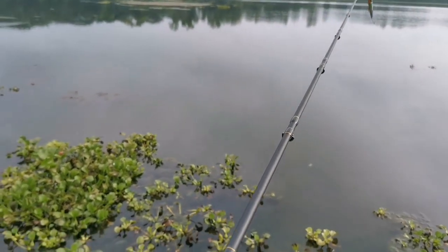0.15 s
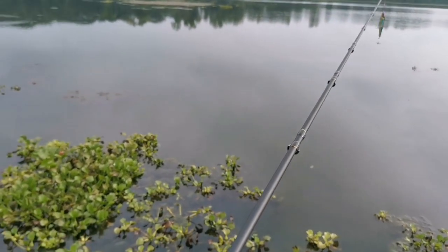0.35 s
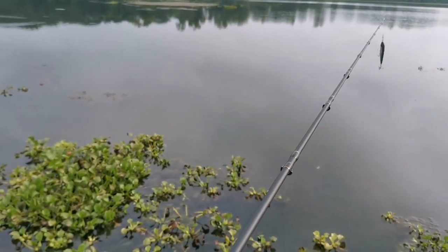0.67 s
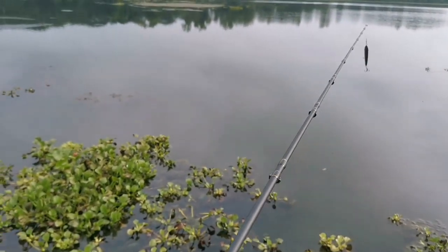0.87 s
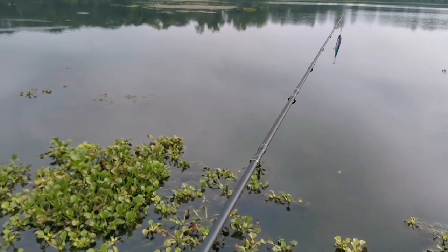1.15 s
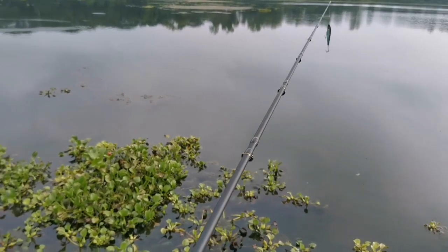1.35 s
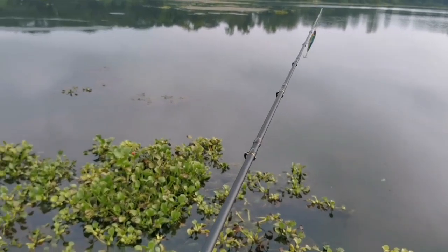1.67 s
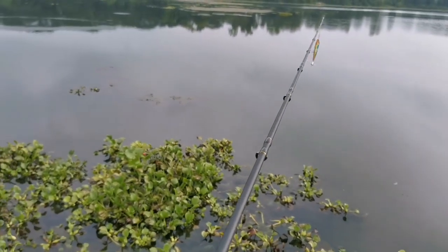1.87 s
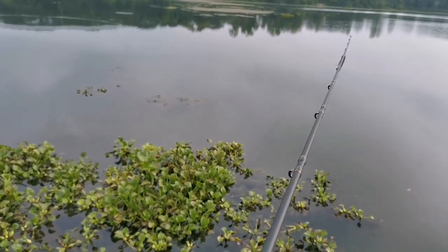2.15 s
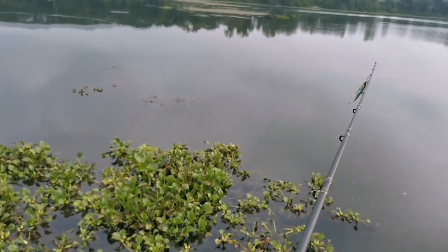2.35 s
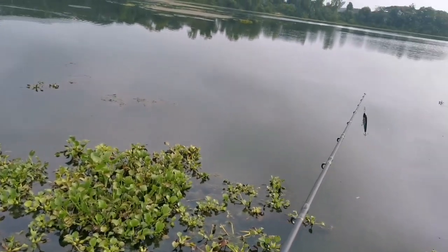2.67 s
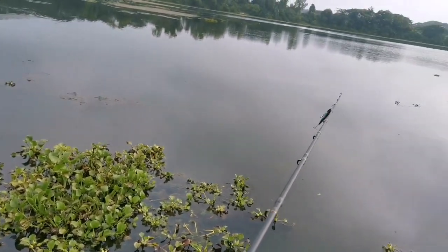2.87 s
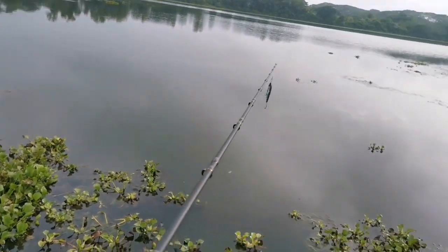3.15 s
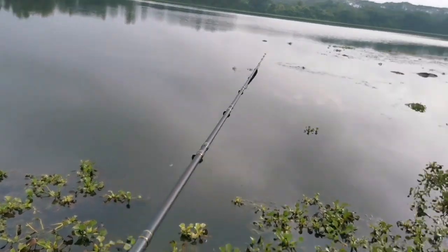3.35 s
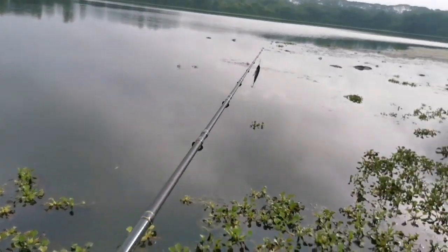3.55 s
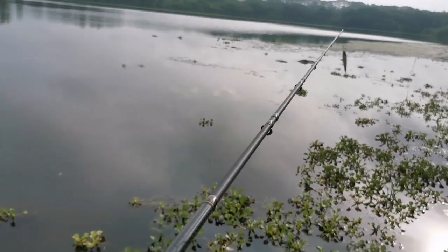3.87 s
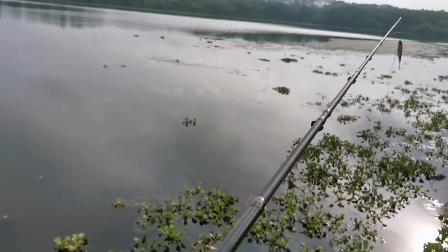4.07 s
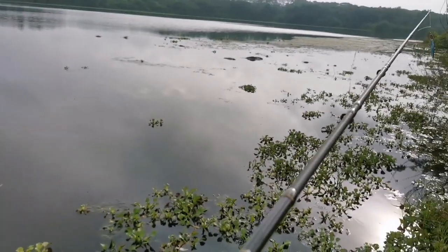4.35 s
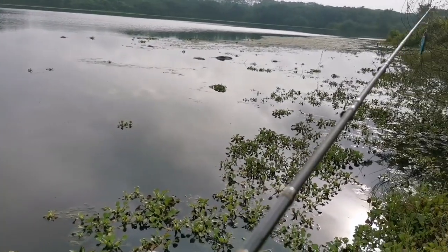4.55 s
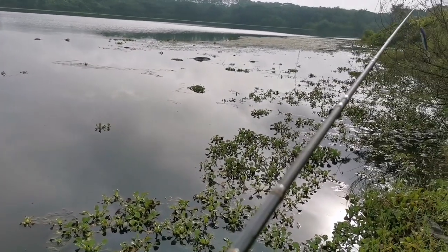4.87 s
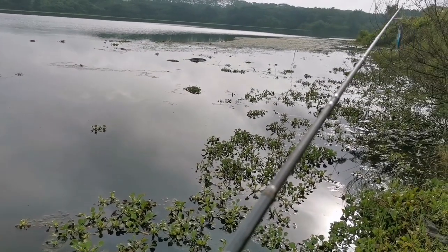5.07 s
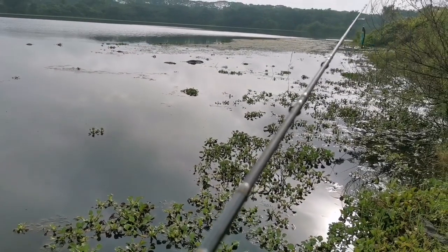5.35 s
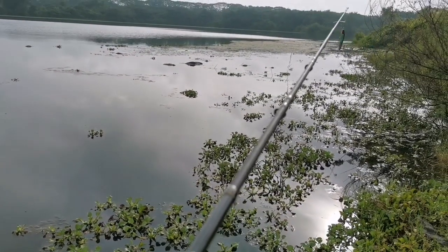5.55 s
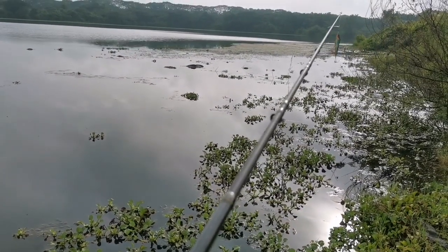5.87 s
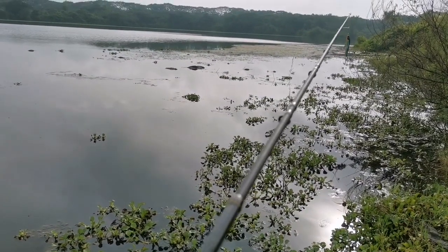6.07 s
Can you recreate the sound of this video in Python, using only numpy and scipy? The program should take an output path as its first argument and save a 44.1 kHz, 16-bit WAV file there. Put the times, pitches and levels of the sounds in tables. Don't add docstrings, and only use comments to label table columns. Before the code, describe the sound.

A still lakeside in open air, close stereo camera microphone. From 0 s a low motor drones faintly across the water, over rumble that eases and soft hiss. Crickets trill rapidly near 5 kHz, the nearest in bouts at 0.7-2.1, 2.8-3.8 and 4-6.1 s; katydids buzz and rasp near 10 kHz, strongly left. Soft bumps and rubs on the rod start at once, with sharper taps at 0.7, 1.2 and 2.1-2.6 s. Thin bird whistles and warbles are faint and far. The motor revs up slightly until 3 s, then drops low and faint by 4.2 s, swelling again after 5 s. At 3.2-3.7 s the camera turns and the katydids dim. The reel clicks at 3.85 and, sharper, at 4.85 s. From 4 s gusts thump the left; from 4.7 s quick falling chips repeat every 0.3 s. After 5 s wind pops patter, a distant frog rattle sags, and short insect rasps pulse.

```python
import sys
import numpy as np
from scipy import signal
from scipy.fft import rfft, irfft
from scipy.io import wavfile
from scipy.ndimage import uniform_filter1d

SR = 44100
rng = np.random.default_rng(int(sys.argv[2]) if len(sys.argv) > 2 else 0)


def digitize_waveform(pressure):
    field = np.atleast_2d(pressure).T
    bounded = np.clip(field, -1, 1)
    quanta = np.round(bounded * 32767).astype(np.int16)
    wavfile.write(sys.argv[1], SR, quanta)


def gain_from_db(level_db):
    decades = np.asarray(level_db, float) / 20
    return 10 ** decades


N = 274302
T = np.arange(N) / SR
HZ = np.fft.rfftfreq(N, 1 / SR)
PORT_LAG, ROD_LAG = 15.8, 5

# pitch_hz, left_db_per_hz, right_db_per_hz
AIR_COLOUR = [(19.3, -8.5, -19), (40, -10, -6.5), (79, -3.5, -4), (262, -10.5, -12), (510, -18.5, -20.5),
              (1400, -32, -30), (4100, -37.5, -35.5), (6300, -49, -49), (6260, -39, -39), (8230, -47, -79),
              (11100, -27, -49), (12700, -97, -47.5), (14500, -107, -52.5), (16100, -78, -63)]
# start_s, firing_hz, level_db
MOTOR = [
    (0, 99.73, -51.5),
    (.9, 102.9, -46.5),
    (2.1, 107.7, -53.5),
    (2.95, 108.9, -55.5),
    (3.15, 102, -54),
    (3.76, 79.96, -49.5),
    (4.2, 71.85, -59.5),
    (4.8, 87.06, -58.5),
    (5.3, 87, -49),
    (6.22, 88.85, -50),
]
# pitch_hz, level_db
HUM = [
    (398.4, -64),
]
# start_s, length_s, level_db, settled_pitch_hz
CRICKET_BOUTS = [
    (0, 0.14, -67, 5040),
    (.68, 1.415, -64.5, 5076),
    (2.8, 1.0, -67.5, 5090),
    (4.0, 2.08, -65, 5150),
]
# start_s, lead_chirps (over a steady beat)
CRICKET_LEAD = [
    (0, 0.23),
    (1.0, 0.16),
    (2.1, 0.3),
    (2.85, -0.28),
    (3.15, 0.22),
    (3.75, 0.27),
    (4.35, 0.085),
    (4.72, .04),
    (5.15, -0.26),
    (6.22, -0.31),
]
# start_s, lead_throbs, depth_0_to_1
KATYDID_THROB = [
    (0, -0.64, 0.3),
    (.4, -0.96, 0.1),
    (1.1, -0.99, 0.4),
    (2.4, -0.99, 0.45),
    (4.8, -1.007, .55),
    (5.3, -0.69, 0.47),
    (5.6, -0.38, .47),
    (6.22, -0.38, 0.15),
]
# start_s, turn_0_to_1
CAMERA_TURN = [
    (0, 0.27),
    (.8, 0.24),
    (1.5, 0.06),
    (2.9, 0.23),
    (3.25, 0.36),
    (3.7, 0.9),
    (4.6, 0.89),
    (6.22, 0.86),
]
# start_s, end_s, level_db
RASP_PHRASES = [
    (4.4, 4.66, -69),
    (4.917, 5.3, -66.5),
    (5.484, 5.931, -68.5),
    (6.089, 6.299, -75),
]
# start_s, peak_db, ring_hz, left_minus_right_db
BUMPS = [
    (.054, -53, 900, 15),
    (0.149, -63, 1940, -9),
    (.519, -51, 780, -10),
    (0.588, -48.5, 656, -1),
    (1.609, -58, 622, 1),
    (2.61, -43.5, 875, 5),
    (3.728, -61, 620, .5),
    (4.336, -55, 690, -11),
]
# start_s, peak_db, ring_hz, left_minus_right_db
TAPS = [(.092, -41, 1020, -2.5), (.705, -41, 790, -5), (.7055, -36.5, 2500, -9), (1.2205, -36, 3240, -6),
        (.723, -26, 2120, -10), (1.22, -36, 2051, -7.5), (1.732, -48.5, 847, -5), (2.092, -46, 834, 10),
        (2.109, -43.5, 925, 6), (2.442, -31.5, 970, 4), (2.451, -43, 850, -6), (2.504, -48.5, 948, 2),
        (2.588, -52, 1310, 14), (2.629, -39.5, 2470, 1), (3.753, -48.5, 860, 1), (3.788, -49.5, 875, -4),
        (5.021, -45.5, 612, -7)]
# start_s, peak_db, ring_hz, snap_db, thump_db
REEL_CLICKS = [
    (3.844, -44, 4053, -19, -17),
    (3.857, -37, 2600, -8, 10),
    (4.846, -30, 4460, -17, -17),
    (4.85, -30, 2450, -22, -10.5),
    (4.866, -50, 672, -22, 19),
]
# peak_s, rise_s, fall_s, dull_db, bright_db
RUBS = [(.15, .15, .35, -65, -84), (.58, .18, .14, -65, -82), (1.26, .14, .07, -60, -86),
        (2.15, .13, .33, -57, -74), (2.615, .16, .1, -62, -70), (3.76, .1, .1, -66, -88),
        (3.912, .035, .025, -72, -58), (3.98, .05, .12, -64, -80), (4.76, .015, .02, -84, -58),
        (4.832, .052, .02, -74, -44.5), (4.85, .009, .009, -56, -33), (4.862, .009, .012, -52, -52)]
# start_s, length_s, first_pitch_hz, last_pitch_hz, peak_db
WHISTLES = [(0.11, 0.25, 2100, 1260, -57), (0.362, 0.038, 2660, 2860, -70),
            (0.402, 0.048, 2820, 2520, -63.5), (.64, .025, 2400, 2150, -67), (.44, 0.028, 2670, 2780, -63),
            (1.568, 0.021, 2730, 2750, -67.5), (2.874, 0.016, 2500, 2900, -56.5),
            (4.354, 0.023, 2640, 2890, -64), (4.975, .03, 3150, 2600, -57), (5.75, 0.084, 3150, 2650, -74),
            (5.39, 0.082, 3170, 3600, -62.5), (5.533, 0.055, 3396, 3240, -66),
            (5.205, .045, 3190, 3500, -70)]
# start_s, length_s, first_pitch_hz, last_pitch_hz, peak_db
WARBLES = [
    (1.03, .14, 2800, 2600, -66.5),
    (1.24, .065, 2650, 2730, -64),
    (1.3, .068, 2750, 3120, -63),
    (.545, .065, 2828, 2900, -66),
    (.17, .09, 2150, 2300, -69),
]
# start_s, peak_db, pitch_hz
CHIP_PHRASES = [
    (4.697, -35.5, 3680),
    (5.004, -30, 3700),
    (5.285, -31, 3580),
    (5.5943, -28.5, 3520),
    (5.865, -37, 3410),
    (6.133, -35.5, 3420),
]
# delay_s, level_db, pitch_ratio
CHIP_NOTES = [
    (0, 3.5, 0.98),
    (.042, -0.5, 0.9),
    (0.065, -3.5, .96),
]
# start_s, peak_db, pitch_hz
LEAD_INS = [
    (4.9778, -29.5, 3390),
    (5.582, -30, 3300),
]
# peak_s, peak_db
GUSTS = [(4.048, -32), (4.33, -40), (4.509, -36.5), (4.69, -43), (4.899, -42), (5.02, -34), (5.23, -43),
         (5.37, -31.5), (5.512, -40.5), (5.73, -40), (5.87, -41), (5.99, -49)]
# start_s, peak_db
WIND_POPS = [(5.021, -39), (5.026, -35), (5.079, -47), (5.089, -43), (5.142, -36.5), (5.19, -41.5),
             (5.21, -42), (5.33, -46), (5.378, -47.5), (5.406, -48.5), (5.423, -45), (5.564, -44),
             (5.673, -43.5), (5.735, -44), (5.756, -42), (5.83, -46), (5.844, -41), (5.862, -35),
             (5.905, -41), (6.043, -66), (6.122, -54), (6.157, -46), (6.17, -44.5), (6.207, -45)]


def unit(x):
    return x / np.sqrt(np.mean(x ** 2))


def curves(table):
    s, *columns = np.transpose(table)
    return [np.interp(T, s, c) for c in columns], (T >= s[0]) & (T <= s[-1])


def band(x, lo_hz, hi_hz, order=2):
    return signal.sosfilt(signal.butter(order, [lo_hz, hi_hz], "band", fs=SR, output="sos"), x)


def walk(rate_hz):
    hold = int(SR / rate_hz)
    steps = np.repeat(rng.standard_normal(N // hold + 1), hold)
    return 1.3 * uniform_filter1d(uniform_filter1d(steps, hold), hold)[:N]


def place(x, pan_db, wet=0., t60=.1, lag=0):
    fade = np.exp(-np.log(1000) * np.arange(SR // 4) / (t60 * SR))
    fade = fade / np.sqrt(np.sum(fade ** 2))
    leaves = rng.standard_normal((2, SR // 4)) * fade
    tails = [signal.fftconvolve(x, leaf)[:N] if wet else 0 * x for leaf in leaves]
    direct = np.array([np.roll(x, int(lag)), x])
    left = 2 / (1 + gain_from_db(-pan_db + 0 * T))
    return (direct + wet * np.array(tails)) * np.array([left, 2 - left]) / np.sqrt(1 + wet ** 2 / 2)


def air():
    hz, *port_db = np.transpose(AIR_COLOUR)
    colour = gain_from_db(np.array([np.interp(np.log(HZ + 1), np.log(hz), db) for db in port_db]))
    alike = np.clip(1.05 - HZ / 1500, 0, .9)
    apart = np.sqrt(1 - alike ** 2)
    shared, left, right = rfft(rng.standard_normal((3, N)) * gain_from_db(0.26 * walk(5.69)))
    late = np.exp(-2j * np.pi * HZ * PORT_LAG / SR)
    ports = colour * np.array([alike * shared * late + apart * left, alike * shared + apart * right])
    rumble_db = -53 + 7 * np.exp(-T / 0.86)
    rumble, hiss = irfft(ports * (HZ < 700), N), irfft(ports * (HZ >= 700), N)
    return (rumble * gain_from_db(rumble_db) + hiss * gain_from_db(-52.5)) / rumble.std()


def motor():
    (hz, level_db), _ = curves(MOTOR)
    phase = 2 * np.pi * np.cumsum(hz * (1 + 0.00988 * walk(9))) / SR
    tone = np.sin(phase) + gain_from_db(-13.5) * (np.sin(2 * phase) + 0.69 * np.sin(3 * phase))
    tone *= gain_from_db(level_db + 0.5 + 0.65 * walk(3.88))
    hum = sum(gain_from_db(db + 3 + 1.5 * walk(8)) * np.sin(2 * np.pi * f * T + .7 * walk(9)) for f, db in HUM)
    return place(tone, 0.4, lag=PORT_LAG) + place(hum, 1.0, lag=PORT_LAG)


def strokes(count_so_far, hz, glide, duty, scatter_db, spread):
    index, frac = np.divmod(count_so_far - np.floor(count_so_far.min()), 1)
    index = index.astype(int)
    pitch_chance, size_chance = rng.standard_normal((index.max() + 1, 2))[index].T
    into = np.clip(frac / duty, 0, 1)
    pitch = hz * (1 + spread * pitch_chance + glide * (.5 - into))
    return np.sin(np.pi * into) * gain_from_db(scatter_db * size_chance) * np.sin(2 * np.pi * np.cumsum(pitch) / SR)


def chirps(beat, hz):
    strokes_per_beat = 3.2
    stroke = strokes_per_beat * (beat % 1)
    which = stroke.astype(int)
    size = gain_from_db(np.array([-1, 0, -8, -40]))[which]
    arch = np.array([.992, 1.012, .96, .96])[which]
    count = np.ceil(strokes_per_beat) * np.floor(beat) + stroke
    tone = strokes(count, hz * arch, glide=.05, duty=.88, scatter_db=1.2, spread=.007)
    return unit(size * gain_from_db(2.1 * walk(500)) * tone)


def crickets():
    (lead,), _ = curves(CRICKET_LEAD)
    level_db, hz = np.full(N, -77.), np.full(N, 1. * CRICKET_BOUTS[0][3])
    for s, length, bout_db, bout_hz in CRICKET_BOUTS:
        cold = np.exp(-np.abs(T - s) / 0.31) * (s > 0)
        on = (T >= s) & (T < s + length)
        level_db[on] = (bout_db - 6 * cold)[on]
        hz[on] = (bout_hz * (1 - .04 * cold))[on]
    near = chirps(25 * T + lead + .33, hz) * gain_from_db(level_db + 3)
    singers = [(24.2, 4900, -2), (23.6, 4780, -4), (24.9, 4620, -8),
               (25.6, 4980, -4), (23.1, 4850, -4), (24.6, 4480, -15)]
    far = sum(chirps(rate * T + .3 * walk(.7), f) * gain_from_db(db + 2.5 * walk(1.2)) for rate, f, db in singers)
    return (place(near, -2.2, wet=.4, t60=.03, lag=1)
            + place(far * gain_from_db(-68.5), -6.0, wet=0.86, t60=0.04, lag=2.5))


def buzz(rate, hz):
    tone = strokes(rate * T + .3 * walk(3), hz, glide=.03, duty=.8, scatter_db=2.2, spread=.005)
    return gain_from_db(2.5 * walk(900)) * tone


def throbber(throbs, rate, hz):
    into = throbs % 1
    swell = uniform_filter1d((.5 + into) * (into < .74), size=300)
    return unit(swell * buzz(rate, hz))


def rasp(rate, lo_hz, hi_hz):
    gate = 0.097 + np.cos(np.pi * (rate * T + 0.29 * walk(2.4))) ** 4
    return unit(band(gate * rng.standard_normal(N), lo_hz, hi_hz, order=5))


def turned(facing, away):
    (turn,), _ = curves(CAMERA_TURN)
    return [a + (b - a) * turn for a, b in zip(facing, away)]


def katydids():
    throb_hz = 8.5
    (lead, depth), _ = curves(KATYDID_THROB)
    share = np.clip(1.9 * depth, 0, .995)
    throbbing = throbber(throb_hz * T + lead + 0.375, 130, 9580)
    steady = unit(buzz(122, 9600))
    pair = share * throbbing + np.sqrt(1 - share ** 2) * steady
    level_db, pan_db = turned(facing=(-64, 48), away=(-77, 8))
    out = place(pair * gain_from_db(level_db), pan_db + 8, wet=.7, t60=.03)

    faint = throbber(throb_hz * T + 0.091, 90, 9900) * gain_from_db(-83.5) * (T < 1.26)
    out += place(faint, -32.0, wet=.7, t60=.03)

    level_db, pan_db = turned(facing=(-66.5, 25), away=(-83, -9))
    rasps = rasp(142, 10700, 11900) + .9 * rasp(116, 10100, 11500)
    out += place(rasps * gain_from_db(level_db - 3), pan_db + 3, wet=.7, t60=.12)

    phrase = sum(gain_from_db(db - 10.5) * np.clip((T - start) / 0.095, 0, 1) * (T < end)
                 for start, end, db in RASP_PHRASES)
    return out + place(phrase * rasp(210, 9300, 10970), -2.0, wet=0.81, t60=0.019)


def knocks():
    out = np.zeros((2, N))
    t = T[:SR // 20]
    hits = [(s, db, hz, -37, -41, pan_db) for s, db, hz, pan_db in TAPS]
    hits += [(s, db, hz, -15, -9.5, pan_db) for s, db, hz, pan_db in BUMPS]
    hits += [(*click, -4) for click in REEL_CLICKS]
    for s, db, hz, snap_db, thump_db, pan_db in hits:
        noise = rng.standard_normal((2, len(t)))
        t60 = .017 * (1000 / hz) ** 1.3
        ring = 1.11 * np.sin(2 * np.pi * hz * t) * np.exp(-np.log(1000) * t / t60)
        crack = 0.74 * band(noise[0] * np.exp(-t / 0.0019), 610, 3270, order=3)
        snap = gain_from_db(snap_db + 19.5) * band(noise[1] * np.exp(-t / .0008), 3100, 12800, order=3)
        thump = -gain_from_db(thump_db + 2.5) * np.sin(2 * np.pi * 300 * t) * np.exp(-t / 0.0018)
        ports = gain_from_db(db + np.array([[pan_db], [-pan_db]]) / 2)
        i = int((s + 0.001344) * SR)
        out[:, i:i + len(t)] += ports * (ring + crack + snap + thump)
    out[0] = np.roll(out[0], ROD_LAG)
    return out


def rubs():
    grain = gain_from_db(2.5 * walk(160)) * rng.standard_normal((2, N))
    dull = unit(band(grain[0], 830, 1230) + 1.3 * band(grain[0], 607, 2280))
    bright = unit(band(grain[1], 2300, 9000) + 0.59 * band(grain[1], 4030, 4700))
    rub = np.zeros((2, N))
    edge_db = -13
    for s, rise, fall, dull_db, bright_db in RUBS:
        (press_db,), on = curves([(s - rise, edge_db), (s, 0), (s + fall, edge_db)])
        rub += on * gain_from_db(press_db) * np.array([gain_from_db(dull_db) * dull, gain_from_db(bright_db) * bright])
    return place(rub[0], -1., wet=.5, t60=.12) + place(rub[1], -5., wet=.7, t60=.02, lag=ROD_LAG + 1)


def tackle():
    out = knocks() + rubs()
    out[1] = signal.sosfilt(signal.butter(3, 5800, fs=SR, output="sos"), out[1]) + 0.18 * out[1]
    return out


def whistle(call, warble=0.):
    s, length, first_hz, last_hz, peak_db = call
    into = np.clip((T - s) / length, 0, 1)
    wobble = 1 + warble * np.sin(2 * np.pi * 33 * T + walk(6.3))
    hz = (first_hz + (last_hz - first_hz) * into) * wobble
    level_db = peak_db - 15 * ((into - .35) / 0.87) ** 2
    on = uniform_filter1d(1. * (into > 0) * (into < 1), size=300)
    return on * gain_from_db(level_db + 1.5 + 3.4 * walk(60)) * np.sin(2 * np.pi * np.cumsum(hz) / SR)


def frogs():
    start_s, attack_s = 4.98, .25
    level_db = -63.5 - 3.5 * (T - start_s)
    on = np.clip(1 + (T - start_s) / attack_s, 0, 1) ** 3
    rattle = unit(band(gain_from_db(1.5 * walk(70)) * rng.standard_normal(N), 2280, 2850, order=3))
    return place(rattle * gain_from_db(level_db) * on, -4., wet=.9, t60=.3, lag=2)


def birds():
    song = sum(whistle(call) for call in WHISTLES) + sum(whistle(call, warble=0.059) for call in WARBLES)
    t = T[:SR // 150]
    chips = [(s + late, db + note_db, hz * ratio)
             for s, db, hz in CHIP_PHRASES for late, note_db, ratio in CHIP_NOTES]
    for s, db, hz in chips + list(LEAD_INS):
        swell = np.sin(np.pi * t / t[-1]) ** 2
        i = int(s * SR)
        song[i:i + len(t)] += gain_from_db(db - 17.0) * swell * np.sin(2 * np.pi * hz * t * (1.05 - 9 * t))
    return place(song, -3., wet=.35, t60=.2, lag=2)


def wind():
    rise_db_per_s, fall_db_per_s = 218, 162
    push = sum(gain_from_db(db - np.where(T < s, rise_db_per_s * (s - T), fall_db_per_s * (T - s))) for s, db in GUSTS)
    thump = unit(band(gain_from_db(5.2 * walk(30)) * rng.standard_normal(N), 43.4, 107.4)) * push

    kicks = np.zeros(N + SR)
    t = T[:SR // 100]
    for (s, db), way in zip(WIND_POPS, rng.choice([-1, 1], len(WIND_POPS))):
        i = int(s * SR)
        kicks[i:i + len(t)] += way * gain_from_db(db + 6.5) * np.exp(-np.abs(t - .0015) / 0.00028)
    kicks = kicks[:N]

    crowding = uniform_filter1d(np.abs(kicks), size=3000) / np.abs(kicks[5 * SR:]).mean()
    flicks_per_s = 300 + 250 * crowding
    flick = rng.standard_normal(N) * (rng.random(N) < flicks_per_s / SR)
    flick *= gain_from_db(-49 + 2.5 * walk(6)) * (T > 5.03)
    kicks += np.convolve(flick, np.exp(-np.abs(t[:120] - .0012) / 0.0008))[:N]
    pops = place(band(kicks, 150, 2500, order=1), -2.5, wet=.25, t60=.06)
    return np.array([thump, .12 * np.roll(thump, 300)]) + pops


def scene():
    return air() + motor() + crickets() + katydids() + tackle() + birds() + wind() + frogs()


def top_cut(x):
    return signal.sosfilt(signal.butter(12, 14970, fs=SR, output="sos"), x)


def record(dry):
    return top_cut(dry)


dry = scene()
out = record(dry)
digitize_waveform(out)
```